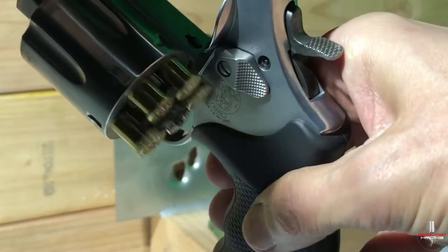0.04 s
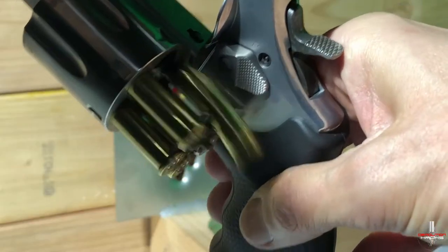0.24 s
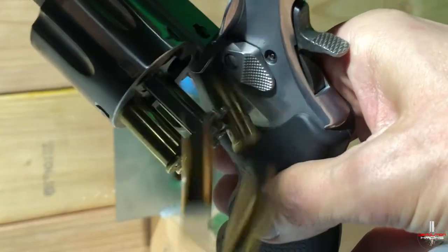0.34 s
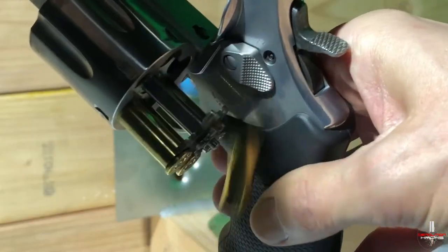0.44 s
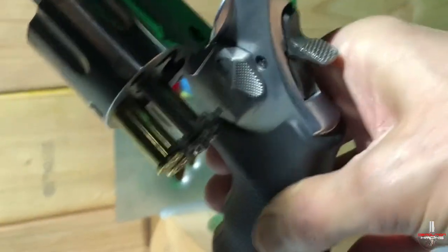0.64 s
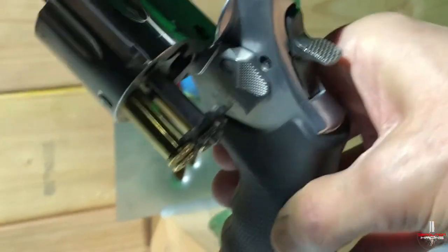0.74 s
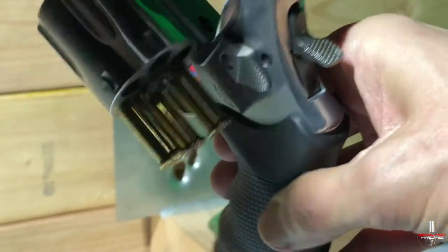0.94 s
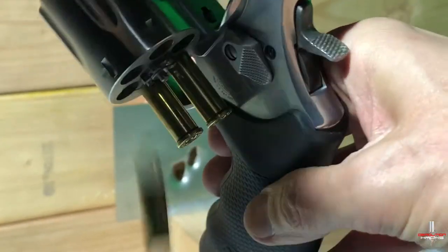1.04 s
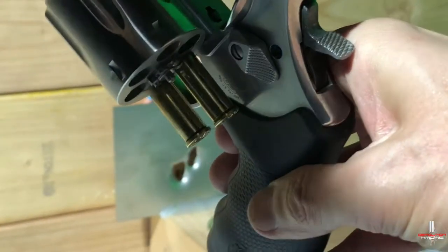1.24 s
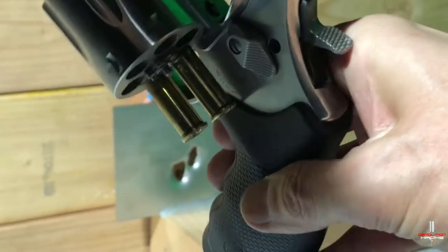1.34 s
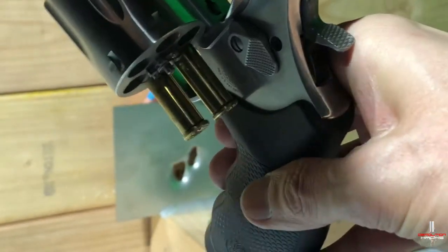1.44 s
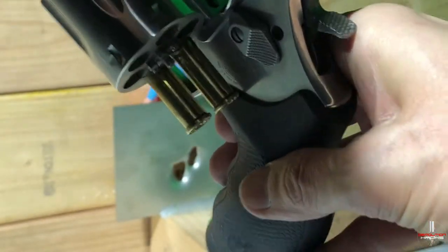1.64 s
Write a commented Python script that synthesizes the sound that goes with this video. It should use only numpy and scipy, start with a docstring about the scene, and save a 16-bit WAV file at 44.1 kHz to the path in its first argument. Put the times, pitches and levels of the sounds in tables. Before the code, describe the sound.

Spent brass cases drop from a revolver, clinking and bouncing on wood.

```python
"""A live room with a low hum, the microphone close to a revolver as spent brass cases are pushed out.
The ejector slides, metal rubbing on metal, and the cases clink and ring as they come free.
They knock and bounce on a wooden surface below; the knocks fill the room, the gun stays drier.
The ejector springs back with a steel snap; two more cases drop, and metal starts to scrape again."""
import sys
import numpy as np
from scipy import signal
from scipy.fft import rfft, irfft
from scipy.io import wavfile

SR = 44100
rng = np.random.default_rng(int(sys.argv[2]) if len(sys.argv) > 2 else 0)


def dump(signal):
    """Clip the signal to [-1, 1] and save it as 16-bit WAV at the path in sys.argv[1]."""
    limited = np.clip(np.atleast_2d(signal).T, -1, 1)
    pcm = np.round(limited * 32767).astype(np.int16)
    wavfile.write(sys.argv[1], SR, pcm)


N = 74970
T = np.arange(N) / SR
SHORT = T[:SR // 10]

# Room tone, rumble to hiss. Each row: frequency in Hz, relative level in dB.
ROOM_TONE_SPECTRUM = [(25, -16), (60, -17), (110, 3.5), (170, -8), (350, -14), (800, -24.5), (2000, -24),
                      (6000, -35), (16000, -44.5)]
# The hum behind everything. Each row: frequency in Hz, base level in dB.
HUM_TONES = [(87, -52.5), (63.4, -59.5), (122.8, -57.5)]
# The hum's rise and fall. Each row: time in seconds, gain in dB.
HUM_SWELL = [(0, 2.5), (.3, 4.5), (.45, -1), (1.0, -3), (1.7, -1.5)]
# The room's diffuse tail. Each row: frequency in Hz, level in dB, time to fall 60 dB (t60) in seconds.
ROOM_TAIL = [(152, -15.5, 0.74), (442, -6.5, .9), (970, -15.5, 1), (1575, -14, 1), (3200, -19, 1),
             (7000, -17.5, 0.41), (14800, -22, 0.14)]
# Echoes off walls and ceiling. Each row: delay in seconds, gain in dB.
WALL_ECHOES = [(0.0142, -17.5), (.0170, -27.5), (.0315, -21), (0.0343, -23.5)]

# Clicks of the action, close up. Each row: start in seconds, gain in dB, treble cutoff in Hz.
ACTION_CLICKS = [(.0370, -31.5, 4900), (.0720, -34, 3770), (.1015, -25, 5000), (.2110, -38.5, 8000),
                 (.8662, -14, 9000), (.8693, -7.5, 19100), (.8715, -2.5, 19000), (1.6230, -32.5, 16200),
                 (1.6665, -37, 15800)]
# The colour of struck or scraped steel. Each row: frequency in Hz, relative level in dB.
STEEL_SPECTRUM = [(500, -8.5), (1500, -10.5), (3500, 3.5), (5400, 2.5), (6500, -2.5), (7700, 4.5),
                  (9500, 2.5), (11500, -2.5), (13900, 8.5), (15500, -3), (17000, -20.5)]
# Steel ringing after a click. Each row: frequency in Hz, relative level in dB, t60 in seconds.
STEEL_RING = [(7600, -22, .025), (13190, -22, .025), (13882, -18, .03)]
# Metal sliding on metal. Each row: start and end in seconds, first and last gain in dB, cutoff in Hz.
METAL_SLIDES = [(0, 0.025, -50, -46.5, 4950), (0.081, 0.23, -49.5, -50, 6500),
                (0.835, 0.868, -47.5, -34.5, 15650), (0.881, 0.932, -38, -51, 16000),
                (1.663, 1.726, -34, -46, 15700)]
# The falling resonance of the ejector stroke. Each row: time in seconds, frequency in Hz, level in dB.
EJECTOR_SQUEAK = [(0, 1720, -48), (.06, 1610, -63.5), (.105, 1513, -46.5), (0.138, 1358, -52),
                  (.19, 1385, -57.5), (.24, 1320, -80)]

# Brass touching metal near the microphone. Each row: start in seconds, gains in dB of the tick,
# the low mode and the high mode, time left free to ring in seconds.
CASE_CLINKS = [(0.249, -19.5, -34, -17.5, 0.017), (0.2634, -25, -39, -30, 0.1),
               (.3105, -34.5, -37, -63, 0.18), (.3195, -46, -53, -70, 0.078), (0.3738, -21.5, -30, -27, .3),
               (0.3835, -27, -29, -35, 0.14), (0.3951, -26.5, -63, -30, 0.074), (1.431, -28, -35, -53, .2)]
# The colour of that touch. Each row: frequency in Hz, relative level in dB.
CLINK_SPECTRUM = [(620, -50), (1450, -14), (2350, -14.5), (3150, 4.5), (4700, -7), (7100, -7), (9300, 5),
                  (12400, -5.5), (15100, -3), (17000, -6)]
# Cases hitting the wood below. Each row: start in seconds, knock gain in dB, tick gain in dB,
# pitch in Hz, lag of the near reflection in milliseconds, gain of the knock in that reflection in dB.
LANDINGS = [(.5276, -1, -22, 1850, 2.4, -12), (.5343, -6, -27, 1850, 1.9, 2),
            (.6540, 0, -9, 1900, 2.4, -10), (.7130, -6, -16, 2050, 2.2, -6),
            (.7259, -9, -16, 1850, 2.7, -8), (.7802, -22, -35, 2000, 2.7, -7),
            (.7932, -5, -20, 1800, 2.5, -8), (.8218, -14, -29, 1750, 2.7, -9),
            (.8866, -3, -18, 1850, 1.7, -6), (.8978, -14, -30, 1650, 1.8, -8),
            (.9044, -15, -25, 1750, 2.5, -4), (.9320, -18, -35, 1750, 1.7, -8),
            (.9622, -9, -23, 1600, 2.7, -4), (.9794, -19, -30, 1650, 2.5, -4),
            (.9978, -14, -31, 1650, 1.8, -5), (1.0309, -10, -24, 1600, 2.6, -9),
            (1.2106, 1.5, -13, 1800, 3.07, -1), (1.2691, -20, -32, 1850, 2.7, -8),
            (1.4289, -10, -28, 1850, 2.0, -4), (1.4300, 1, -9, 1850, 2.8, -7),
            (1.5173, -14, -24, 1750, 2.6, -9), (1.5461, -20, -35, 1750, 2.8, -9)]
# The wood's modes at the usual pitch. Each row: frequency in Hz, relative level in dB, t60 in seconds.
WOOD_MODES = [(321, -16, 0.015), (481, -11.5, 0.0094), (832, -7, 0.0081), (1104, -2.5, 0.0058),
              (1884, 4, 0.0045), (3055, -4.5, 0.0031), (3710, -5.5, 0.0043)]
USUAL_PITCH_HZ = 1898
# The tick of brass on wood. Each row: frequency in Hz, relative level in dB.
TICK_SPECTRUM = [(2000, -15), (4500, -0.5), (7000, -4), (11000, -5), (15000, -4), (17000, -21)]
# Brass ringing, damped by the wood. Each row: frequency in Hz, relative level in dB, t60 in seconds.
LANDED_CASE_MODES = [(6062, -44, .22), (14780, -50, .1)]


def from_db(db):
    """Decibels to gain."""
    return 10 ** (np.asarray(db) / 20)


def unit_rms(x):
    """Scale to unit rms."""
    return x / np.sqrt(np.mean(x ** 2) + 1e-20)


def add(out, start, x):
    """Mix x into out from start, in seconds."""
    i = int(np.clip(round(start * SR), 0, N))
    out[i:i + len(x)] += x[:N - i]


def lowpass(x, hz):
    """Gentle second-order low-pass."""
    return signal.sosfilt(signal.butter(2, min(hz, SR / 2 - 100), fs=SR, output="sos"), x)


def colour(x, spectrum):
    """Give a noise a spectrum, at unit rms."""
    hz, db = np.transpose(spectrum)
    f = np.maximum(np.fft.rfftfreq(len(x), 1 / SR), 1)
    gain = from_db(np.interp(np.log(f), np.log(hz), db))
    return unit_rms(irfft(rfft(x) * gain, len(x)))


def decay(t, t60):
    """Envelope that loses 60 dB in t60 seconds."""
    return np.exp(-np.log(1000) * t / t60)


def mode(t, hz, t60):
    """One struck mode: a dying sine."""
    return np.sin(2 * np.pi * hz * t) * decay(t, t60)


def burst(spectrum, t60):
    """Dying noise for a dense cluster of modes, with the same energy at every strike."""
    envelope = decay(SHORT, t60)
    x = colour(rng.standard_normal(len(SHORT)), spectrum) * envelope
    return x * np.sqrt(np.sum(envelope ** 2) / np.sum(x ** 2))


def wander(hz):
    """Random drift, mostly slower than hz, at unit rms."""
    return unit_rms(lowpass(rng.standard_normal(N + SR), hz)[SR:])


def room_tone(waver=0.17, noise_db=-51.5):
    """The bed of the scene: a wavering low hum over the room's rumble and hiss."""
    hum = np.zeros(N)
    for hz, db in HUM_TONES:
        phase = 2 * np.pi * (hz * T + rng.random()) + waver * wander(3.9)
        hum += from_db(db) * np.sqrt(2) * np.sin(phase) * (1 + waver * wander(2.5))
    swell = from_db(np.interp(T, *np.transpose(HUM_SWELL)))
    return hum * swell + from_db(noise_db) * colour(rng.standard_normal(N), ROOM_TONE_SPECTRUM)


def room_reverb(x, onset_s=0.001, echo_cutoff_hz=2600):
    """What the room returns to the microphone: a few dull echoes and a tail whose treble dies first."""
    hz, db, t60 = np.transpose(ROOM_TAIL)
    f = np.fft.rfftfreq(N, 1 / SR)
    white = rfft(rng.standard_normal(N))
    edges_hz = np.geomspace(80, 18000, 17)
    tail = np.zeros(N)
    for low, high in zip(edges_hz, edges_hz[1:]):
        log_centre = np.log(low * high) / 2
        band = irfft(white * (f >= low) * (f < high), N)
        envelope = decay(T, np.interp(log_centre, np.log(hz), t60)) * (1 - np.exp(-T / onset_s))
        gain = from_db(np.interp(log_centre, np.log(hz), db))
        tail += gain * band * envelope / np.sqrt(np.sum(envelope ** 2))
    out = signal.fftconvolve(x, tail)[:N]
    dull = lowpass(x, echo_cutoff_hz)
    for delay, echo_db in WALL_ECHOES:
        add(out, delay, from_db(echo_db) * dull)
    return out


def steel_clicks():
    """Steel parts strike and ring briefly; the loudest cluster is the ejector springing back."""
    out = np.zeros(N)
    ring = sum(from_db(db) * mode(SHORT, hz, t60) for hz, db, t60 in STEEL_RING)
    for start, db, cutoff_hz in ACTION_CLICKS:
        strike = from_db(-2.5) * burst(STEEL_SPECTRUM, t60=0.0067)
        add(out, start, from_db(db) * lowpass(strike + ring, cutoff_hz))
    return out


def metal_scrapes(grains_per_s=1600):
    """Metal slides on metal: a stream of tiny impacts, louder with the pressure."""
    out = np.zeros(N)
    grains = (rng.random(N) < grains_per_s / SR) * rng.choice([-1, 1], N)
    grain_db = -0.5 * np.minimum(rng.exponential(1, N), 4)
    scrape = colour(grains * from_db(grain_db), STEEL_SPECTRUM)
    for start, end, first_db, last_db, cutoff_hz in METAL_SLIDES:
        pressure = (T >= start) * (T < end) * from_db(np.interp(T, [start, end], [first_db, last_db]))
        out += lowpass(scrape, cutoff_hz) * lowpass(pressure, 100)
    return out


def ejector_squeak(width_hz=90, knock_db=-7.5):
    """The ejector stroke rubs a falling resonance, and each click during the stroke knocks it."""
    times, hz, db = np.transpose(EJECTOR_SQUEAK)
    phase = 2 * np.pi * np.cumsum(np.interp(T, times, hz)) / SR
    rub = unit_rms(wander(width_hz) * np.sin(phase) + wander(width_hz) * np.cos(phase))
    out = rub * from_db(np.interp(T, times, db)) * (T < times[-1])
    for start, click_db, _ in ACTION_CLICKS:
        if start < times[-1]:
            ring = mode(SHORT, np.interp(start, times, hz), t60=0.041)
            add(out, start, from_db(click_db + knock_db) * ring)
    return out


def ringing_cases(low_hz=6062, high_hz=14772, split_hz=22, twin_db=-11):
    """A case rings in two shell modes, the upper a close pair, and is damped after its free time."""
    out = np.zeros(N)
    low = mode(T, low_hz, t60=0.24)
    high = mode(T, high_hz, t60=0.18) + from_db(twin_db) * mode(T, high_hz + split_hz, t60=0.18)
    for start, tick_db, low_db, high_db, free_s in CASE_CLINKS:
        ring = from_db(low_db) * low + from_db(high_db + 3) * high
        damping = decay(np.maximum(T - free_s, 0), t60=0.014)
        add(out, start, ring * damping)
        add(out, start, from_db(tick_db - 0.5) * burst(CLINK_SPECTRUM, t60=0.012))
    return out


def board_radiation(x, bass_lag_s=0.00488, lag_below_hz=469, low_cut_hz=235):
    """The board radiates little bass, and late: low bending waves travel slowly along it."""
    f = np.fft.rfftfreq(len(x), 1 / SR)
    lag = bass_lag_s / (1 + (f / lag_below_hz) ** 2)
    phase = 2 * np.pi * (np.cumsum(lag) - lag[0]) * f[1]
    dispersed = irfft(rfft(x) * np.exp(-1j * phase), len(x))
    return signal.sosfilt(signal.butter(3, low_cut_hz, "high", fs=SR, output="sos"), dispersed)


def wood_knock(pitch_hz, scatter_db=1.5, contact_hz=3790):
    """Heavily damped wood modes, heard by their velocity, so they add little far below their pitch."""
    wood = np.zeros(len(SHORT))
    for k, (usual_hz, db, t60) in enumerate(WOOD_MODES):
        hz = usual_hz * pitch_hz / USUAL_PITCH_HZ
        velocity = np.diff(mode(SHORT, hz, t60), prepend=0) * SR / (2 * np.pi * hz)
        wood += (-1) ** k * from_db(db + scatter_db * rng.normal()) * velocity
    return board_radiation(lowpass(wood, contact_hz))


def cases_on_wood(tick_t60=0.0016, near_tick_db=4.5, second_reflection_db=-12):
    """Each landing is a dead knock, a brass tick and a faint ring; a nearby surface reflects the hit."""
    out = np.zeros(N)
    for start, knock_db, tick_db, pitch_hz, lag_ms, near_knock_db in LANDINGS:
        knock = from_db(knock_db) * wood_knock(pitch_hz)
        tick_gain = from_db(tick_db - 1)
        tick = tick_gain * burst(TICK_SPECTRUM, tick_t60)
        add(out, start, knock + tick)
        # Two reflections follow, each flipping the knock's polarity.
        near_tick = tick_gain * from_db(near_tick_db) * burst(TICK_SPECTRUM, tick_t60)
        reflection = near_tick - from_db(near_knock_db) * knock
        lag_s = lag_ms / 1000
        add(out, start + lag_s, reflection)
        add(out, start + 2 * lag_s, -from_db(second_reflection_db) * reflection)
        ring = sum(from_db(db) * mode(T, hz, t60) for hz, db, t60 in LANDED_CASE_MODES)
        add(out, start, from_db(tick_db / 2) * ring)
    return out


def scene(gun_reverb_db=-5.5):
    """One microphone: the gun is close and nearly dry, while the landings fill the room."""
    gun = ringing_cases() + steel_clicks() + metal_scrapes() + ejector_squeak()
    landings = cases_on_wood()
    reverb = room_reverb(landings + from_db(gun_reverb_db) * gun)
    return (room_tone() + reverb + gun + landings)[None]


def record(dry, stopband_hz=17200):
    """The loudest peaks are rounded and the very top of the treble is cut."""
    limited = dry / (1 + dry ** 6) ** (1 / 6)
    return signal.sosfilt(signal.cheby2(14, 70, stopband_hz, fs=SR, output="sos"), limited)


dry = scene()
out = record(dry)
dump(out)
```